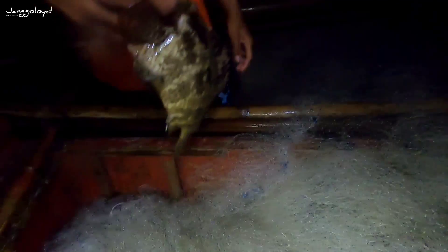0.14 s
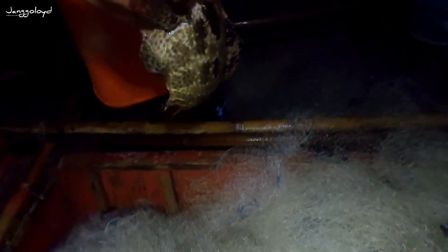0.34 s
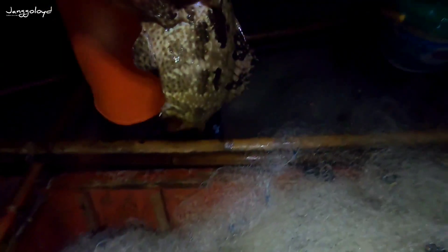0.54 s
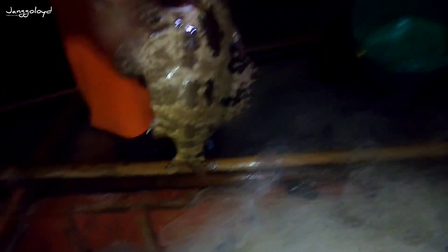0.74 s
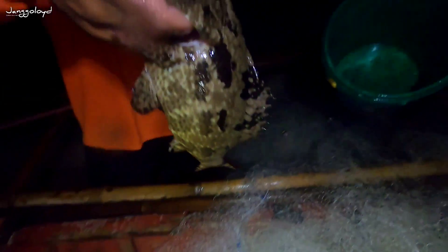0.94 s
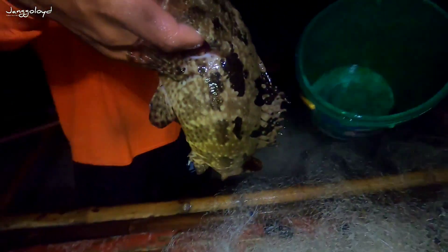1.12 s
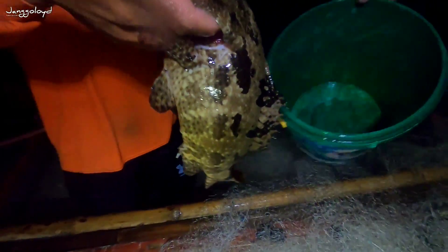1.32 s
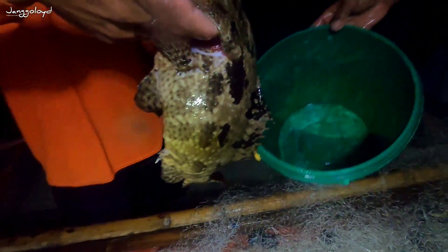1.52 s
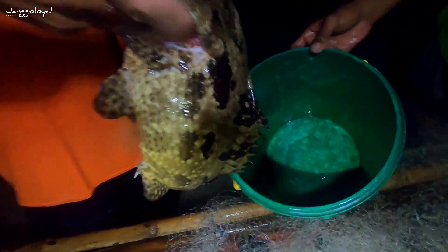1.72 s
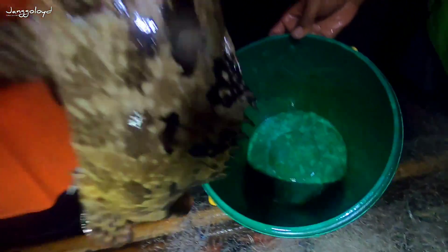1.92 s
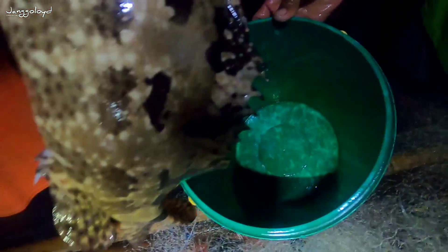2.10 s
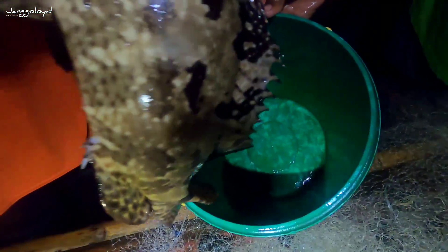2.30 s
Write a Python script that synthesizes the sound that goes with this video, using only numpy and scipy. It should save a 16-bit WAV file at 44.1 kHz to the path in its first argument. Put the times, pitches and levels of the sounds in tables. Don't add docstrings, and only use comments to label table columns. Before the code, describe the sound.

Wet fingers fumble against a sealed camera case aboard a small boat: scrapes, a tiny squeak ending in a loud snap, and heavy knocks, then near quiet with swelling low rumble, soft hiss and tiny drips.

```python
import sys
import numpy as np
from scipy import signal
from scipy.io import wavfile
from scipy.ndimage import uniform_filter1d

SR = 44100
rng = np.random.default_rng(int(sys.argv[2]) if len(sys.argv) > 2 else 0)


def persist_wave(psi):
    counts = np.round(np.clip(psi, -1, 1) * 32767).astype(np.int16)
    wavfile.write(sys.argv[1], SR, np.atleast_2d(counts).T)


def invert_db(level):
    return 10 ** (np.asarray(level, dtype=float) / 20)


N = 103635
SHORT, LONG = 2048, 16384

# centre_hz, width_hz, level_db
HULL_MODES = [(35, 15, 0), (52, 16, -16), (115, 35, -22), (185, 40, -33)]
# time_s, level_db
HULL_SWELL = [
    (0, -5),
    (1.0, -5),
    (1.2, 1),
    (1.4, 2),
    (1.6, -3),
    (1.72, 1),
    (1.95, -4),
    (2.1, 4),
    (2.2, -1),
    (2.35, -4),
]
# centre_hz, width_hz, level_db
AIR_MODES = [(400, 250, -15), (620, 300, -17), (1000, 80, -8), (1180, 90, 0), (1330, 100, -7),
             (1650, 400, -12), (2300, 700, -9), (3000, 400, -11), (4300, 1200, -16), (6000, 2000, -28),
             (11000, 9000, -36)]
# time_s, gain_db
AUTO_GAIN = [
    (0, 0),
    (.8, -3),
    (.95, -6),
    (1.15, -15),
    (1.32, -17),
    (1.5, -10),
    (1.65, -8),
    (1.85, -6),
    (2.35, -6),
]
# time_s, gain_db
STEREO_WIDTH = [
    (0, 0),
    (.95, 0),
    (1.25, -14),
    (1.32, -30),
    (2.35, -30),
]
# start_s, peak_db, pitch_hz,
# t60_s
DRIPS = [(0, -42, 500, .012), (0, -46, 1150, .04), (.015, -48, 960, .04), (.028, -51, 2000, .03),
         (.055, -50, 1420, .04), (.301, -26, 620, .016), (.672, -17, 590, .018), (.75, -25, 580, .02),
         (.899, -26, 640, .02), (.588, -20, 110, .08), (.44, -33, 115, .1), (1.9, -48, 200, .07),
         (1.82, -47, 1200, .04), (.552, -30, 2110, .04), (.588, -16, 573, .035), (.857, -19, 565, .025),
         (1.02, -58, 950, .07), (1.39, -64, 1000, .05), (1.432, -65, 530, .05), (1.51, -59, 1170, .08),
         (1.622, -55, 1190, .06), (1.77, -62, 650, .06), (1.78, -66, 3050, .06), (1.845, -58, 950, .05),
         (1.885, -57, 960, .05), (2.272, -56, 1000, .04)]
# time_s, level_db
RUB_FORCE = [(0, -80), (.175, -70), (.19, -42), (.285, -56), (.315, -41), (.365, -42), (.39, -57),
             (.425, -48), (.46, -60), (.53, -48), (.575, -52), (.6, -36), (.665, -41), (.68, -57),
             (.835, -56), (.855, -37), (.905, -39), (.935, -75), (2.35, -120)]
# start_s, peak_db, pitch_hz, t60_s, left_right_db
TICKS = [(.184, -35, 4100, .005, -1), (.199, -40, 4300, .005, 0), (.2325, -12, 2950, .007, 4),
         (.672, -16, 4430, .004, 6), (.751, -28, 6500, .004, 4), (.233, -22, 1900, .012, 0),
         (.232, -50, 7900, .004, 4), (.315, -32, 950, .015, -2), (.323, -34, 900, .015, -2),
         (.34, -33, 2960, .008, 6), (.359, -28, 4000, .005, 0), (.36, -42, 8200, .004, 4),
         (.36, -33, 6200, .004, 0), (.499, -38, 3290, .01, 7), (.501, -36, 1500, .012, 0),
         (.511, -32, 3100, .005, 4), (.522, -40, 2600, .006, 4), (.534, -33, 2900, .007, 5),
         (.552, -28, 4600, .012, 0), (.607, -32, 3000, .025, 7), (.6135, -42, 8000, .0012, 10),
         (.618, -39, 8200, .0012, 10), (.6185, -20, 3240, .009, 7), (.635, -52, 9800, .002, 10),
         (.672, -3, 3180, .0042, 7), (.672, -28, 9000, .002, 18), (.672, -42, 14700, .002, 16),
         (.751, -18, 1290, .012, 0), (.752, -20, 296, .01, 0), (.751, -43, 8700, .003, 6),
         (.78, -42, 4000, .003, 2), (.791, -43, 4500, .003, 2), (.801, -46, 3700, .004, 5),
         (.848, -32, 3000, .03, 5), (.858, -22, 330, .014, 1), (.868, -46, 9500, .002, 8),
         (.87, -15, 3160, .005, 7), (.873, -40, 7800, .002, 8), (.889, -46, 8500, .002, 8),
         (.857, -44, 8500, .002, 8)]
# start_s, peak_db, spot_pitch_hz, hollow_peak_db, left_right_db
TAPS = [(.185, -28, 1940, -48, -1), (.198, -30, 1310, -50, -2), (.216, -33, 1240, -50, -2),
        (.232, -18, 2800, -26, -.5), (.301, -30, 1000, -27, -3.5), (.341, -29, 1290, -40, 0),
        (.359, -20, 1920, -38, -2), (.42, -35, 1170, -40, -1.5), (.51, -29, 1160, -40, 0),
        (.534, -28, 1100, -44, 0), (.551, -20, 2110, -40, -1), (.589, -19, 1900, -15, 1),
        (.617, -34, 3240, -45, 4.5), (.672, -14, 3190, -13, 3), (.716, -50, 4400, -55, -2.5),
        (.7505, -9, 1900, -10, 0), (.767, -44, 4400, -55, 1), (.794, -37, 1460, -38, 2),
        (.828, -38, 3300, -45, 2), (.857, -15, 3200, -5.5, 0), (.87, -13, 1640, -26, -.5),
        (.888, -15, 1530, -26, 3), (.901, -20, 915, -21, -2), (1.821, -43, 1180, -44, 0)]
# pitch_hz, level_db, t60_s, left_lead_rad
WALL_MODES = [(1290, -6, .011, .2), (1640, -6, .011, 2.), (2050, -3, .008, 4.3), (3140, -1, .006, 4.),
              (4500, -7, .005, 6.8), (6400, -17, .004, 11.8), (3800, -6, .005, 5.5), (2600, -5, .007, 4.1)]
# pitch_hz, level_db, t60_s
HOLLOW_MODES = [(571, 0, .028), (380, -3, .02), (265, -7, .022), (175, -7, .035), (760, -7, .014)]
# start_s, peak_db, pitch_hz, t60_s, direction (push +1, pull -1)
JOLTS = [(.231, -16, 80, .04, -1), (.239, -11, 37, .2, 1), (.301, -16, 55, .06, 1), (.44, -28, 50, .12, -1),
         (.525, -23, 32, .15, 1), (.588, -14, 60, .06, 1), (.597, -10, 30, .14, -1), (.655, -19, 45, .1, 1),
         (.685, -17, 36, .1, -1), (.754, -15, 30, .1, 1), (.79, -22, 40, .1, -1), (.82, -11, 24, .12, -1),
         (.862, -15, 60, .05, -1), (.873, -17, 190, .04, -1), (.875, -8, 40, .08, 1),
         (.898, -10, 50, .06, -1), (.907, -18, 107, .11, -1), (1.822, -35, 255, .06, -1),
         (1.826, -37, 120, .1, 1), (1.848, -39, 190, .08, -1), (1.875, -51, 240, .06, -1)]

HOLLOW_LEAD_RAD, SPOT_LEAD_S = 1.1, .00008
WALL_FROM_HZ = 700


def curve(rows):
    return np.interp(np.arange(N) / SR, *np.array(rows).T)


def unit(x):
    return x / np.sqrt(np.mean(x ** 2))


def peak(x):
    return x / np.abs(x.mean(axis=0)).max()


def low(x, hz):
    return signal.sosfilt(signal.butter(4, min(hz, .45 * SR), fs=SR, output="sos"), x)


def high(x, hz):
    return signal.sosfilt(signal.butter(3, hz, "high", fs=SR, output="sos"), x)


def band(x, hz, width_hz):
    b, a = signal.iirpeak(hz, hz / width_hz * .65, fs=SR)
    return signal.lfilter(b, a, signal.lfilter(b, a, x))


def walk(rate_hz):
    hold = int(SR / rate_hz)
    steps = np.repeat(rng.standard_normal(SHORT), hold)[:N]
    return 1.3 * uniform_filter1d(uniform_filter1d(steps, hold), hold)


def ring(hz, t60_s, lead_rad=0., size=SHORT):
    t = np.arange(size) / SR
    phase = 2 * np.pi * hz * t + np.array([[lead_rad], [0.]])
    return np.exp(-np.log(1000) * t / t60_s) * np.sin(phase)


def add(out, x, start_s):
    i = int(start_s * SR)
    out[:, i:i + x.shape[1]] += x[:, :N - i]


def sides(left_right_db):
    return invert_db(np.array([[left_right_db / 2], [-left_right_db / 2]]))


def lasting(hz, width_hz):
    x = rng.standard_normal((2, N))
    warmed_up = np.hstack([x[:, -LONG:], x])
    return unit(band(warmed_up, hz, width_hz)[:, LONG:])


def bed(modes, flicker_db, rate_hz):
    out = np.zeros((2, N))
    for hz, width_hz, db in modes:
        calm = min(1, (150 / width_hz) ** .4)
        out += invert_db(db + flicker_db * calm * walk(rate_hz)) * lasting(hz, width_hz)
    mid, side = unit(out)
    side = invert_db(-6) * side
    return np.array([mid + side, mid - side])


def rumble():
    return invert_db(-36 + curve(HULL_SWELL)) * low(bed(HULL_MODES, flicker_db=2.5, rate_hz=9), 215)


def air():
    return invert_db(-57) * bed(AIR_MODES, flicker_db=3, rate_hz=22)


def drips():
    out, t = np.zeros((2, N)), np.arange(SHORT) / SR
    swell = 1 - np.exp(-t / .003)
    fade = np.cos(np.pi / 2 * t / t[-1])
    for start_s, db, hz, t60_s in DRIPS:
        add(out, invert_db(db) * peak(ring(hz, t60_s, .5) * swell * fade), start_s)
    return out


def rubbing():
    slips_per_s, edge_hz, hollow_db, shake_db = 4000, 4600, -6, 10
    happens = rng.random((2, N)) < slips_per_s / SR
    scatter = invert_db(2.5 * rng.exponential(size=(2, N)))
    slips = happens * rng.standard_normal((2, N)) * scatter
    slips = (slips[0] + .5 * slips[::-1]) * invert_db(2.5 * walk(60))

    def excited(body):
        return unit(low(signal.fftconvolve(body, slips, axes=1)[:, :N], edge_hz))

    walls = sum(invert_db(db / 1.5) * ring(hz, t60_s, lead) for hz, db, t60_s, lead in WALL_MODES)
    walls = high(walls, WALL_FROM_HZ)
    hz, _, t60_s = HOLLOW_MODES[0]
    hollow = high(ring(hz, t60_s, HOLLOW_LEAD_RAD), 330)
    shake = unit(band(rng.standard_normal(N), 36, 30))
    shake = shake + .35 * unit(low(band(rng.standard_normal((2, N)), 110, 60), 170))
    rub = excited(walls) + invert_db(hollow_db) * excited(hollow) + invert_db(shake_db) * shake
    t = np.arange(N) / SR
    spray = sum(invert_db(db) * np.exp(-((t - centre_s) / .014) ** 2) for centre_s, db in ((.617, -60), (.872, -68)))
    return invert_db(curve(RUB_FORCE)) * rub + spray * unit(band(slips, 7500, 5000))


def ticks():
    rise_cycles = 1.5
    out, t = np.zeros((2, N)), np.arange(SHORT) / SR
    for start_s, db, hz, t60_s, pan_db in TICKS:
        rise = 1 - np.exp(-(t * hz / rise_cycles) ** 2)
        spot = ring(hz, t60_s, 2 * np.pi * hz * SPOT_LEAD_S) * rise
        add(out, invert_db(db) * sides(pan_db) * spot / np.abs(spot).max(), start_s)
    return out


def taps():
    hard_s, softer_s_per_db = .0005, .00006
    tail_db, tail_s, push_s = -32, .006, .0008
    near_db_per_oct = 3.5
    spot_db, spot_t60_s = -1, .009
    edge_hz, duller_per_db = 5600, .05
    out, t = np.zeros((2, N)), np.arange(SHORT) / SR
    hollow = sum(invert_db(db) * ring(hz, t60_s, HOLLOW_LEAD_RAD) for hz, db, t60_s in HOLLOW_MODES)
    push = t * np.exp(-t / push_s * 3)
    hollow = peak(signal.fftconvolve(hollow, push[None]))
    for start_s, db, spot_hz, hollow_db, pan_db in TAPS:
        contact_s = hard_s - softer_s_per_db * db
        press = (t / contact_s) ** 2 * np.exp(1 - (t / contact_s) ** 2)
        tail = invert_db(tail_db) * np.exp(-t / tail_s)
        touch = ((press + tail) * rng.standard_normal(SHORT))[None]
        walls = np.zeros((2, SHORT))
        for hz, mode_db, t60_s, lead in WALL_MODES:
            distance_db = near_db_per_oct * abs(np.log2(hz / spot_hz))
            walls += invert_db(mode_db + 1.5 * rng.standard_normal() - distance_db) * ring(hz, t60_s, lead)
        spot = ring(spot_hz, spot_t60_s, 2 * np.pi * spot_hz * SPOT_LEAD_S)
        body = peak(signal.fftconvolve(walls, touch))
        body = body + invert_db(spot_db) * peak(signal.fftconvolve(spot, touch))
        body = peak(high(low(body, edge_hz * invert_db(duller_per_db * db)), WALL_FROM_HZ))
        add(out, invert_db(db) * sides(pan_db) * body, start_s)
        add(out, invert_db(hollow_db) * sides(pan_db) * hollow, start_s + contact_s)
    return out


def jolts():
    out, t = np.zeros((2, N)), np.arange(LONG) / SR
    rise = 1 - np.exp(-t / .003)
    for start_s, db, hz, t60_s, direction in JOLTS:
        lead = invert_db(-8) * 2 * rng.standard_normal()
        swing = ring(hz, t60_s, lead, size=LONG) * rise
        add(out, np.sign(direction) * invert_db(db) * peak(swing), start_s)
    return out


def squeak():
    snap_s, pitch_hz, level_db, swell_s, pan_db = .6715, 2760, -31, .009, -20
    t = np.arange(N) / SR - snap_s
    swell = np.exp(np.minimum(t, 0) / swell_s) * (t < 0) * invert_db(2 * walk(150))
    cycles = pitch_hz * np.cumsum(1 + .01 * walk(80)) / SR
    return invert_db(level_db) * sides(pan_db) * swell * np.sin(2 * np.pi * cycles)


def scene():
    surroundings = invert_db(curve(AUTO_GAIN)) * (rumble() + air())
    return surroundings + drips() + rubbing() + ticks() + taps() + jolts() + squeak()


def band_limit(x):
    return signal.sosfilt(signal.butter(12, 16430, fs=SR, output="sos"), x)


def record(dry):
    mid = (dry[0] + dry[1]) / 2
    side = (dry[0] - dry[1]) / 2 * invert_db(curve(STEREO_WIDTH))
    ports = np.array([mid + side, mid - side])
    return band_limit(np.tanh(ports * .8) / .8)


dry = scene()
out = record(dry)
persist_wave(out)
```